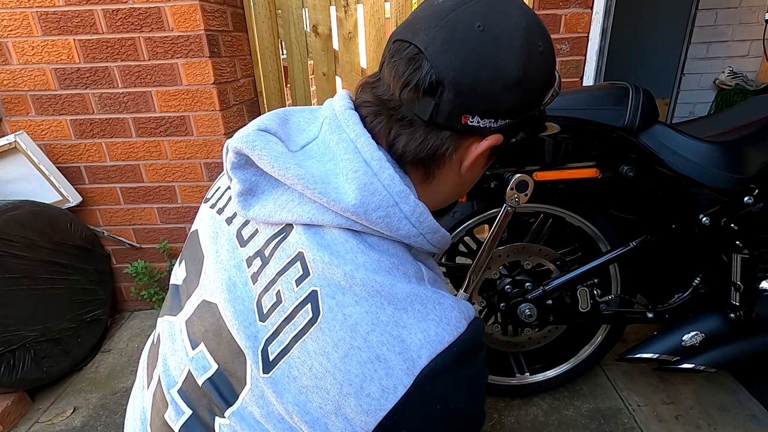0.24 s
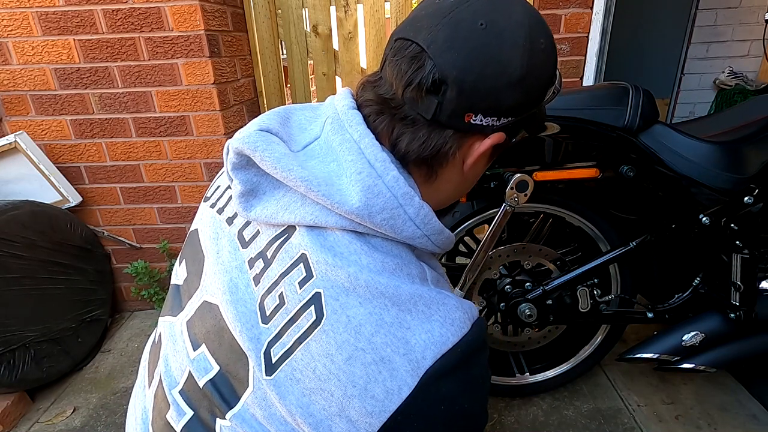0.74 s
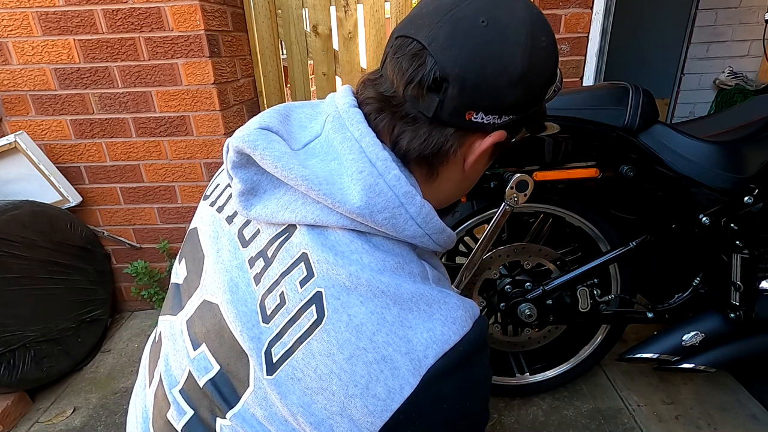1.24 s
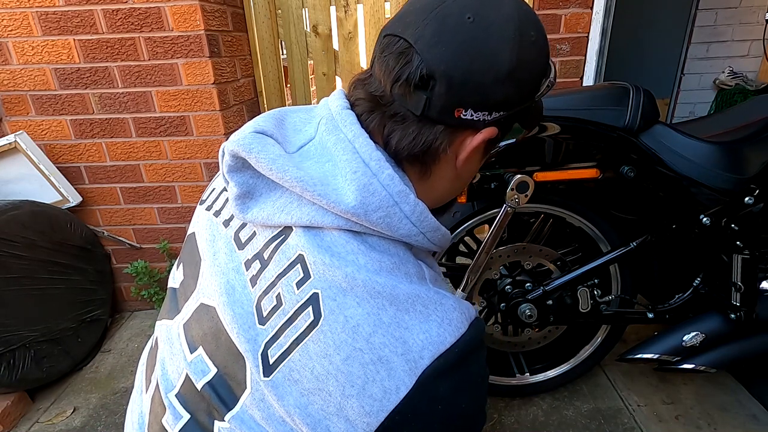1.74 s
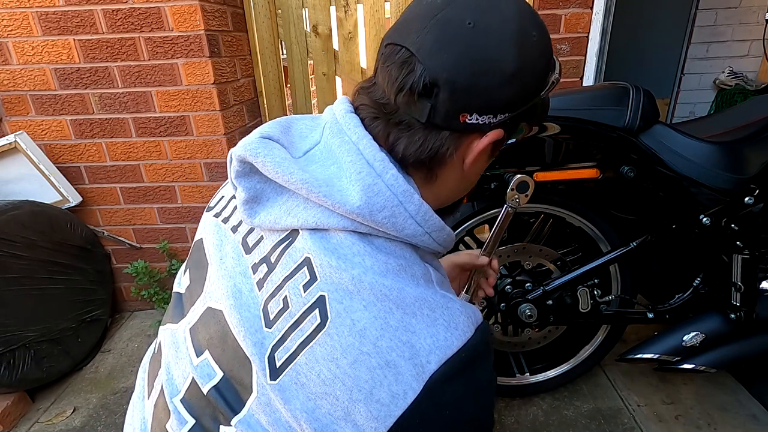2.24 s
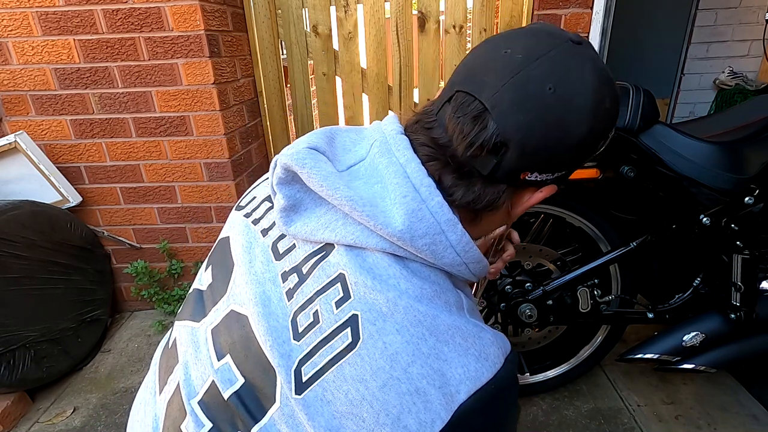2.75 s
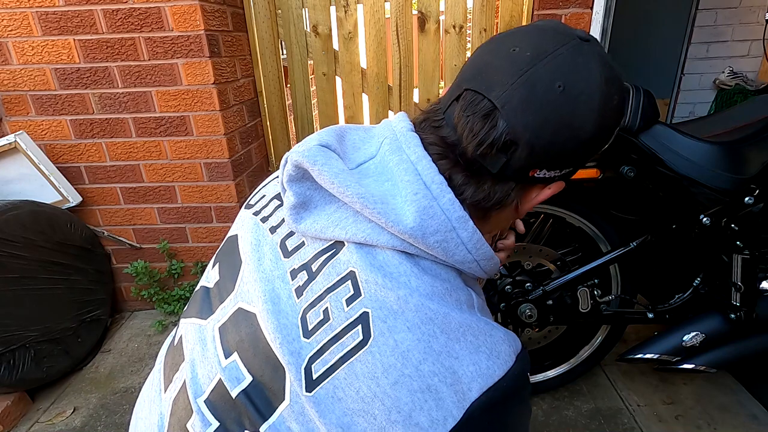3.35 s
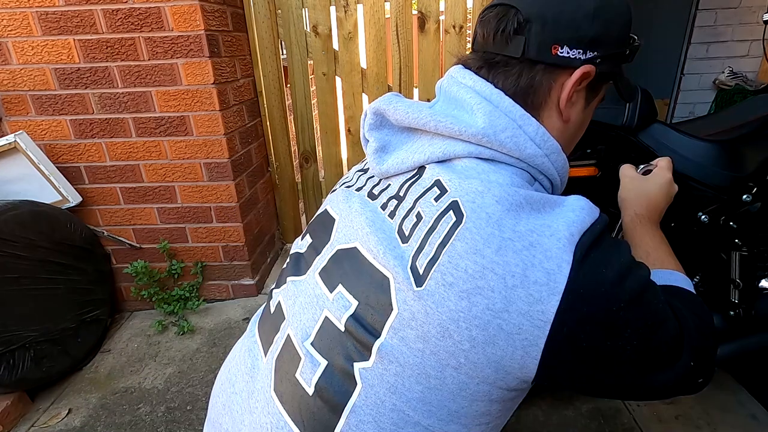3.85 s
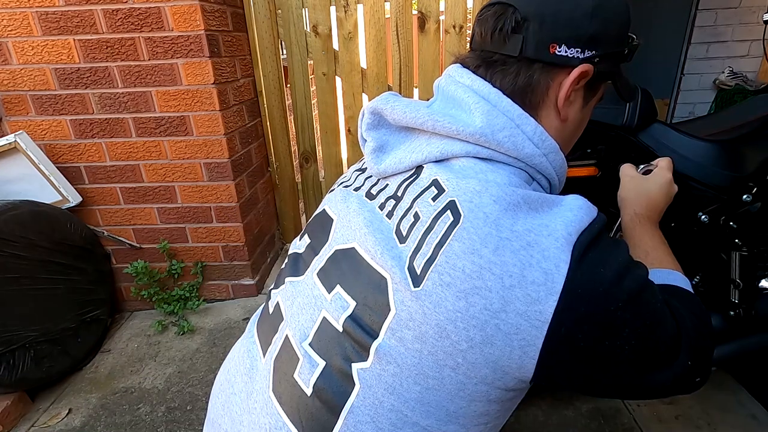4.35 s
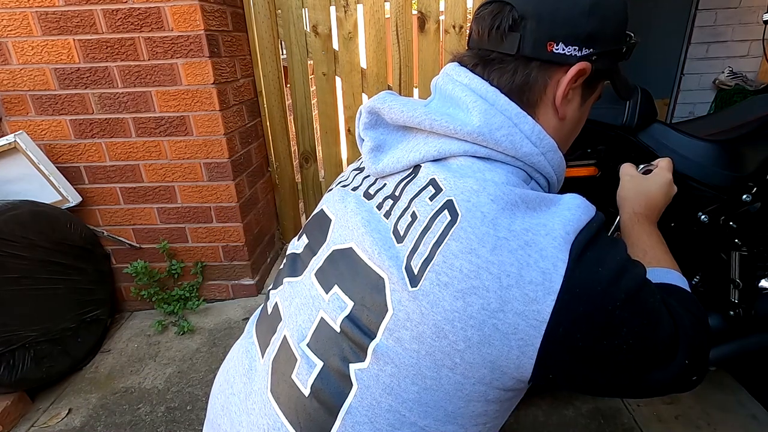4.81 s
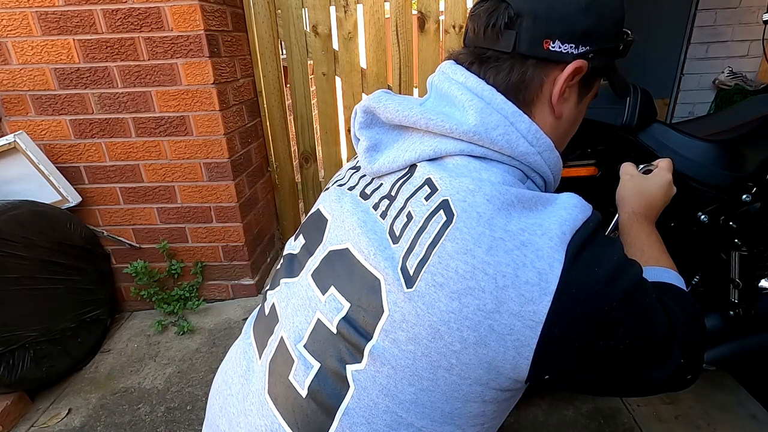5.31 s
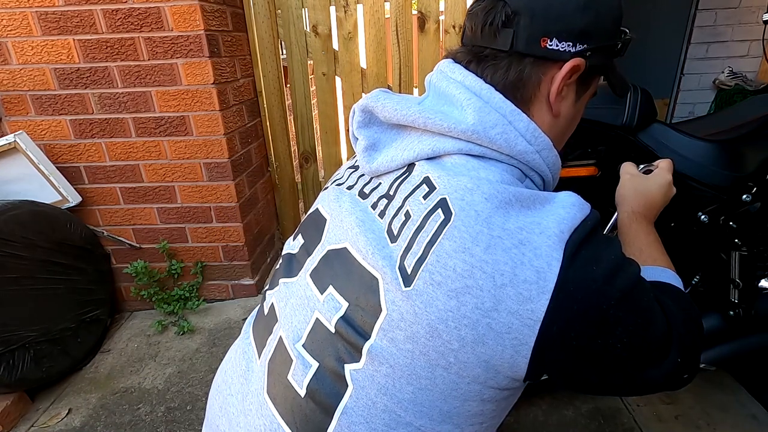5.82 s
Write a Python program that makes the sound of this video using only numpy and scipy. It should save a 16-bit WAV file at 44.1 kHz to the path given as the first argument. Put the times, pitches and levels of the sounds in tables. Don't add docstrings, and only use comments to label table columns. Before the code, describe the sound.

A torque wrench snaps twice, then once more at the very end, in a brick yard while a bird whistles over a low engine and wind rumble.

```python
import sys
import numpy as np
from scipy import signal
from scipy.fft import rfft, irfft, next_fast_len
from scipy.io import wavfile
from scipy.ndimage import uniform_filter1d

SR = 44100
rng = np.random.default_rng(int(sys.argv[2]) if len(sys.argv) > 2 else 0)


def convert_level_to_amplitude(level_db):
    exponent = np.asarray(level_db, float) / 20
    return 10 ** exponent


def store_wav(level_fs):
    pcm = np.round(np.clip(np.atleast_2d(level_fs), -1, 1) * 32767)
    wavfile.write(sys.argv[1], SR, pcm.T.astype(np.int16))


N = 267819
SCENE_CHANGE_S = 3.64
OPPOSITE = np.array([[1], [-1]])


def along(table, hz):
    f, v = np.transpose(table)
    return np.interp(np.log(np.maximum(hz, 1)), np.log(f), v)


def curves(rows):
    s, *columns = np.transpose(rows)
    return [np.interp(np.arange(N) / SR, s, column) for column in columns]


def unit(x):
    return x / np.sqrt(np.mean(x ** 2))


def sides(pan_db):
    return convert_level_to_amplitude(np.array([[pan_db / 2], [-pan_db / 2]]))


def add(out, sound, s):
    i = max(int(s * SR), 0)
    n = min(sound.shape[-1], out.shape[-1] - i)
    out[..., i:i + n] += sound[..., :n]


def band(hz, octaves, size):
    m = next_fast_len(size)
    f = np.arange(m // 2 + 1) * SR / m + 1e-3
    shape = np.exp(-(np.log2(f / hz) / octaves) ** 2)
    noise = rfft(rng.standard_normal((2, m)))
    return unit(irfft(noise * shape, m)[:, :size])


def fade(t, t60):
    return np.exp(-np.log(1000) * t / t60)


def walk(rate):
    k = int(SR / rate)
    held = np.repeat(rng.standard_normal(N // k + 1), k)
    return 1.282 * uniform_filter1d(uniform_filter1d(held, k), k)[:N]


def spaced(x, lag_s):
    m = next_fast_len(N)
    turn = np.exp(-2j * np.pi * np.arange(m // 2 + 1) * SR / m * lag_s)
    return np.array([irfft(rfft(x[0], m) * turn, m)[:N], x[1]])


def yard(x):
    t = np.arange(SR // 2) / SR
    tail = 0
    for hz in 250 * 2. ** np.arange(6):
        t60_s = 0.2855 * (hz / 2000) ** -.2
        tail = tail + band(hz, 1.0, len(t)) * np.sqrt(hz) * fade(t, t60_s)
    tail = tail * (1 - np.exp(-t / 0.052))
    return signal.fftconvolve(x, tail / np.sqrt(np.sum(tail ** 2) / 2), axes=1)[:, :N]


def passing(t, passes):
    return 10 * np.log10(1 + sum(convert_level_to_amplitude(db) ** 2 / (1 + ((t - s) / slow) ** 2) for s, slow, db in passes))


# centre in seconds, half width in seconds, lift in dB.
GUSTS = [(0, .12, 5.5), (.6, 0.13, 2), (1.45, .2, 3.5), (2.17, 0.11, -1.5), (2.76, .1, 2.5), (3.1, 0.19, 3),
         (3.64, .1, -3), (4.0, .12, 11), (4.4, 0.13, 3.5), (4.62, 0.2, 8), (5.34, 0.22, 7),
         (5.62, 0.099, 4), (6.07, 0.24, 7.5)]
# nearest at seconds, distance over speed in seconds, dB over the steady traffic.
DRONE_PASSES = [(1.1, 1.1, 7), (4.0, .15, -4.5), (4.84, .15, 1.5), (5.6, .15, -3)]
ROAR_PASSES = [(1.36, .08, 1.8), (1.84, .12, -1.5), (2.7, 0.094, 1.4), (3.45, .25, 0.49)]


def town_levels(late):
    t = np.arange(N) / SR
    wind = sum(db * np.exp(-((t - s) / half) ** 2) for s, half, db in GUSTS)
    rumble = wind - 1.8 * t * ~late
    hiss = .15 * wind
    return np.array([rumble, passing(t, DRONE_PASSES), passing(t, ROAR_PASSES), hiss])


TOWN_BANDS_HZ = [45, 270, 1000, 5500]
# frequency in Hz, density in dB per Hz.
TOWN_COLOUR = [(12, -41), (20, -14.5), (54, 1), (92, -9.5), (155, -10.5), (224, -15.5), (292, -9),
               (370, -28.5), (422, -18.5), (732, -23.5), (1030, -19), (1740, -35.5), (5250, -50.5),
               (8660, -64.5), (10700, -86), (13900, -115), (22000, -120)]
TOWN_COLOUR_LATE = [(12, -32), (20, -4), (64, 2.5), (102, -12.5), (129, -16.5), (144, -7.5), (164, -4),
                    (292, -18.5), (411, -15.5), (659, -19.5), (977, -14), (1340, -21), (2450, -43.5),
                    (8660, -67), (10700, -89), (13900, -114), (22000, -120)]
# frequency in Hz, shared part from 0 to 1.
LIKENESS = [(60, 0.98), (130, 0.98), (260, 0.98), (540, 0.87), (1130, 0.62), (2360, 0.34), (4910, 0.13),
            (10200, 0.05)]
# frequency in Hz, left minus right in dB.
LEAN = [(60, 1.0), (110, 0.5), (190, 2.5), (330, 1), (590, 6), (1040, 5.5), (1840, 8.5), (3270, 4),
        (5780, 6.5), (10200, 0.5)]


def town():
    late = np.arange(N) >= SCENE_CHANGE_S * SR
    levels = town_levels(late)
    early_mean, late_mean = levels[:, ~late].mean(1)[:, None], levels[:, late].mean(1)[:, None]
    swells = levels - np.where(late, late_mean, early_mean)
    out = 0
    for hz in 22 * 2 ** np.arange(0, 9.1, 1 / 3):
        share = [along(list(zip(TOWN_BANDS_HZ, row)), hz) for row in np.eye(4)]
        db = np.where(late, along(TOWN_COLOUR_LATE, hz) - 66, along(TOWN_COLOUR, hz) - 62)
        db = uniform_filter1d(db + share @ swells, size=300) + 1.0 * walk(8.7)
        alike = np.clip(along(LIKENESS, hz), 0, .999)
        mid, side = band(hz, 0.3, N)
        pair = np.sqrt(1 + alike) * mid + np.sqrt(1 - alike) * side * OPPOSITE
        out = out + convert_level_to_amplitude(db) * np.sqrt(hz) * pair * sides(along(LEAN, hz))
    return out


def tone(hz, db, wobble):
    level = convert_level_to_amplitude(db + 1.5 + 1.2 * walk(8))
    return level * np.sin(2 * np.pi * np.cumsum(hz * (1 + wobble * walk(5.5))) / SR)


# start in seconds, end in seconds, pitch in Hz, level in dB.
HUM_RUNS = [(0, 1.5, 164, -40), (2.298, 3, 154, -47.5), (3.66, 4.19, 161, -41.5), (4.151, 4.58, 165, -43),
            (4.78, 5.23, 162, -37)]


def upper_hum():
    t = np.arange(N) / SR
    idle_hz, idle_db, ramp_s = 162, -52, .06
    hz, db = np.full(N, float(idle_hz)), np.full(N, float(idle_db))
    for start, end, run_hz, run_db in HUM_RUNS:
        on = np.clip(np.minimum(t - start, end - t) / ramp_s + .5, 0, 1)
        hz = hz + on * (run_hz - idle_hz)
        db = db + on * (run_db - idle_db)
    return hz, db


# time in seconds, level in dB.
LOAD = [(0, -38.5), (.6, -44), (.95, -35.5), (1.3, -27.5), (1.5, -35), (1.85, -31), (2.05, -39), (2.8, -41),
        (3.64, -39)]
# level in dB, then drift in dB per second.
MULTIPLES_DB = [1, -5.5, -26.5]
MULTIPLES_DRIFT_DB_PER_S = [0, -3.5, 5.5]


def machines():
    t = np.arange(N) / SR
    firing_hz = 63.26
    load_db, = curves(LOAD)
    early = tone(101, -43.5, 0.0094)
    for k, (db, drift) in enumerate(zip(MULTIPLES_DB, MULTIPLES_DRIFT_DB_PER_S)):
        early = early + tone((k + 1) * firing_hz, load_db + db + drift * t, .008)
    before_change = np.clip((SCENE_CHANGE_S - t) * 100, 0, 1)
    return (early * before_change + tone(*upper_hum(), .012)) * sides(1.3)


def sing(notes, flick_hz, curve):
    voice = np.zeros(N)
    for s, length, first_hz, last_hz, db, warble_hz in notes:
        t = np.arange(int(length * SR)) / SR
        plain = warble_hz < 100
        glide = 1 - (1 - t / length) ** curve
        beat = 2 * np.pi * 87 * t
        hz = first_hz + (last_hz - first_hz) * glide + warble_hz * np.sin(beat)
        hz = hz + flick_hz * plain * np.exp(-t / .0016)
        phase = 2 * np.pi * np.cumsum(hz) / SR
        pure = np.sin(phase) + convert_level_to_amplitude(-31) * np.sin(2 * phase) + convert_level_to_amplitude(-39) * np.sin(3 * phase)
        throb = 1 - np.clip(warble_hz / 280, 0, 1) * (.5 + .5 * np.cos(beat))
        edges = np.clip(np.minimum(t / .002, (length - t) / .004), 0, 1)
        swell = convert_level_to_amplitude((4 if plain else 0) * (glide - .5))
        add(voice, convert_level_to_amplitude(db + 1.5) * pure * throb * edges * swell, s)
    flutter_db = np.where(np.arange(N) < 2.4 * SR, 6.5, 4)
    return voice * convert_level_to_amplitude(flutter_db * walk(400) - flutter_db ** 2 / 9)


# start in seconds, length in seconds, first Hz, last Hz, level in dB.
PEEP = [
    (2.718, .02, 7100, 8200, -66),
    (2.737, 0.031, 8160, 6262, -69),
]


def close_bird():
    warble_depth_hz = 170
    peep = sing([(*note, warble_depth_hz) for note in PEEP], 0, 0.98) * sides(0.5)
    return peep + convert_level_to_amplitude(-3) * np.roll(peep[::-1], 300, axis=1)


# start in seconds, length in seconds, first Hz, last Hz, level in dB.
WHISTLES = [(1.088, 0.23, 4370, 3100, -63), (1.399, 0.083, 3920, 3170, -64.5),
            (1.536, 0.079, 3770, 3286, -50.5), (1.66, 0.051, 3560, 3300, -53.5),
            (1.918, 0.03, 2590, 2430, -53), (1.955, 0.025, 2250, 1710, -52),
            (1.978, 0.076, 3740, 3100, -48), (2.133, 0.1, 3640, 3203, -50),
            (2.423, 0.098, 3815, 3000, -48.5), (2.851, 0.088, 3720, 2953, -43),
            (3.287, 0.088, 3670, 3050, -43)]
# start in seconds, length in seconds, level in dB.
WARBLES = [(1.237, 0.046, -47), (1.605, 0.052, -52), (2.052, 0.041, -49.5), (2.254, 0.067, -51),
           (2.501, 0.0414, -47.5), (2.932, .048, -46.5), (3.368, 0.047, -44.5)]


def song():
    warbles = [(s, length, 2760, 2270, db, 130) for s, length, db in WARBLES]
    return [(*note, 52) for note in WHISTLES] + warbles


# delay in seconds, level in dB, left minus right in dB.
BIRD_ECHOES = [(.02, -5, 3), (.04, -12, 4), (.065, -12, 7), (.1, -20, 7)]


def bird():
    voice = sing(song(), 300, 1.7)
    t = np.arange(int(.05 * SR)) / SR
    for s, *_, db, _ in song():
        add(voice, convert_level_to_amplitude(db - 11) * fade(t, 0.044) * band(4600, 0.79, len(t))[0], s)
    out = spaced(voice * sides(1.5), 4.6e-5)
    t = np.arange(int(.02 * SR)) / SR
    for lag, db, pan_db in BIRD_ECHOES:
        rough = rng.standard_normal(len(t)) * fade(t, .05)
        echo = signal.fftconvolve(voice, rough / np.sqrt(np.sum(rough ** 2)))
        add(out, echo * convert_level_to_amplitude(db) * sides(pan_db), lag)
    return out


# time in seconds, level in dB, left minus right in dB.
SLIPS = [
    (1.350, -46.5, -4),
    (1.710, -48.5, 1),
    (5.9923, -52.5, -6),
    (6.004, -39, -2),
]
# time in seconds, level in dB, left minus right in dB, pitch in Hz, spread in octaves.
FAINT_TICKS = [
    (1.996, -61, 10, 5400, .15),
    (2.430, -57, 0.5, 7000, 0.57),
]
# time in seconds, level in dB, pitch in Hz, spread in octaves, t60 in s.
TAP = [
    (3.4337, -33, 1860, .2, 0.11),
    (3.437, -44, 3196, 0.4, 0.099),
    (3.44, -32, 1000, 0.81, 0.033),
    (3.4414, -29.5, 1856, 0.45, 0.012),
]


def ticks():
    out, t = np.zeros((2, N)), np.arange(int(.1 * SR)) / SR
    rows = [(*slip, 3900, .55, .085) for slip in SLIPS]
    rows += [(*faint_tick, .04) for faint_tick in FAINT_TICKS]
    rows += [(s, db, -2, *rest) for s, db, *rest in TAP]
    for s, db, pan_db, hz, octaves, t60 in sorted(rows):
        touch = fade(t, t60) * np.clip(t / .0006, 0, 1) ** 2
        add(out, convert_level_to_amplitude(db) * sides(pan_db) * band(hz, octaves, len(t))[0] * touch, s)
    return out


def ring(modes, t, tilt_db):
    hz, db, t60 = np.transpose(modes)[:, :, None]
    start = rng.uniform(0, 2 * np.pi, hz.shape) + .25 * rng.standard_normal((2,) + hz.shape)
    gain = convert_level_to_amplitude(db + tilt_db * np.log2(hz / 2000))
    longest = .09 * (hz / 2000) ** -.4
    decay = fade(t, np.minimum(t60, longest))
    return np.sum(gain * decay * np.sin(2 * np.pi * hz * t + start), axis=1)


def bounced(shape):
    out, lag = shape.copy(), 0
    for k in range(9):
        lag += .0019 * 1.18 ** k
        add(out, shape * convert_level_to_amplitude(-6 - 1.9 * k), lag)
    add(out, shape * convert_level_to_amplitude(-13), .017)
    return out


# time in seconds, peak in dB, left minus right in dB, treble tilt in dB per octave,
# frame thud in dB.
SNAPS = [
    (1.361, -4.5, 0.5, 0, -12),
    (1.721, -4, 0, 1.5, -12),
    (6.014, -4.5, -1, 1, -22.5),
]
# pitch in Hz, level in dB, t60 in seconds.
STEEL = [(414, 6, 0.57), (738.7, -5, 0.39), (1290, -18, 0.087), (1450, -13, 0.077), (1520, 9, 0.25),
         (1700, -22.5, 0.36), (2020, -5, 0.25), (2060, 1.5, 0.29), (2452, -7.5, 0.13), (2740, -20.5, 0.3),
         (2982, -9, 0.17), (3400, -13, 0.078), (3601, 0, 0.084), (3731, -18, 0.155), (4060, -27, 2.7),
         (4137, -1.5, 0.1), (5120, -19, 0.4), (5140, -14, 0.15), (5340, -11, 0.04), (6200, -13, 0.3),
         (6570, -17, 0.22), (6570, -12, 0.089), (6900, -11, 0.14), (7400, -36.5, 0.14)]
STEEL_LATE = [(429.5, 4, 0.24), (630, -1, 1.7), (814, 12, 5.0), (1100, -39, 0.18), (1490, -25, 5.0),
              (1654, -25, 0.24), (1920, -26, 0.28), (2150, -18, 0.026), (2520, -4.5, 0.14),
              (2437, -15, 0.25), (3300, -19, 0.17), (3300, -20, 0.73), (3900, -26, 5.0), (4200, -25, 0.14),
              (4612, -35, 2.7), (5000, -18, 0.1), (6400, -31.5, 1.3), (7700, -17.5, 0.15)]
# frequency in Hz, density in dB per Hz.
CLATTER = [(150, -41), (250, -17), (394, -0.5), (531, -21), (751, -2), (892, -15), (1500, -10.5),
           (1840, -8), (2150, -1.5), (2680, -25.5), (3450, -2), (4640, -9), (6990, -16), (10700, -33.5),
           (13900, -77), (22000, -120)]
CLATTER_LATE = [(150, -44), (250, -7.5), (426, -5.5), (531, -20), (800, -5.5), (1030, -28), (1180, -9),
                (1360, -9), (1780, -5.5), (2950, -15.5), (3560, -2), (4720, -11.5), (7210, -15.5),
                (10700, -33.5), (13900, -71), (22000, -120)]
# frequency in Hz, t60 in seconds.
CLATTER_T60 = [(300, 0.053), (1500, 0.22), (4000, 0.051), (10000, 0.11)]
# pitch in Hz, level in dB, t60 in seconds.
THUD = [(124, -4, .2), (162.4, 0.5, 0.15), (200, -5.5, 0.26), (330, -4, .1), (382.3, 3.5, 0.14)]


def wrench():
    out, t = np.zeros((2, N)), np.arange(int(.4 * SR)) / SR
    contact = (1 - np.exp(-t / 0.00015)) ** 2
    for s, db, pan_db, tilt_db, thud_db in SNAPS:
        modes, colour = (STEEL, CLATTER) if s < SCENE_CHANGE_S else (STEEL_LATE, CLATTER_LATE)
        body = convert_level_to_amplitude(-19) * bounced(contact * ring(modes, t, tilt_db))
        for hz in 280 * 2 ** np.arange(0, 5.8, 1 / 3):
            mid, side = band(hz, .25, len(t))
            pair = mid + .3 * side * OPPOSITE
            gain = convert_level_to_amplitude(along(colour, hz) + tilt_db * np.log2(hz / 2000) - 9) * np.sqrt(hz / 2000)
            decay = contact * (fade(t, along(CLATTER_T60, hz)) + 0.88 * fade(t, .02))
            body = body + gain * pair * np.sqrt(bounced(decay ** 2))
        crack = contact * fade(t, .02) * band(2840, 1.1, len(t))[0]
        body = body + convert_level_to_amplitude(2.5) * crack
        add(out, body * convert_level_to_amplitude(db - 8.5) * sides(pan_db), s)
        thud = ring(THUD, t, 0)[0] * (1 - np.exp(-t / .015))
        add(out, convert_level_to_amplitude(db + thud_db) * thud, s)
    return out


def scene():
    far = bird()
    near = spaced(wrench() + ticks(), 1.91 / 44100)
    walls = yard(convert_level_to_amplitude(-17.5) * near + convert_level_to_amplitude(-10) * far * sides(4.35))
    return town() + machines() + close_bird() + far + near + walls


def band_limit(x):
    return signal.sosfilt(signal.butter(12, 15500, fs=SR, output="sos"), x)


def record(dry):
    mix = np.tanh(.5 * dry) / .5
    return band_limit(mix)


dry = scene()
out = record(dry)
store_wav(out)
```